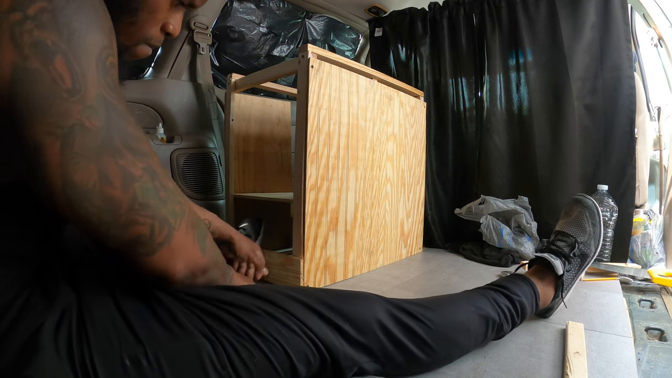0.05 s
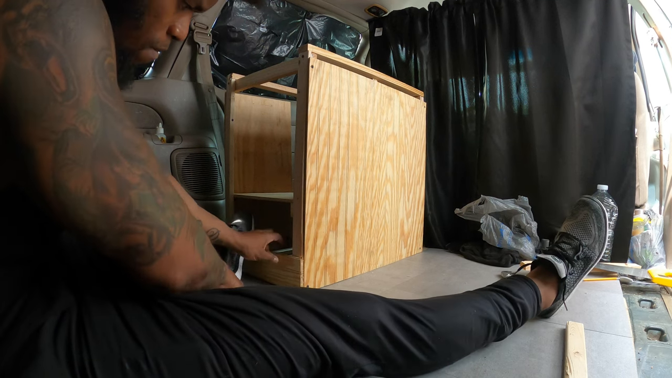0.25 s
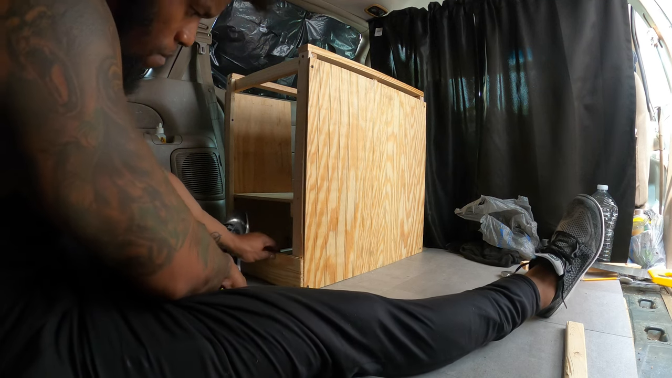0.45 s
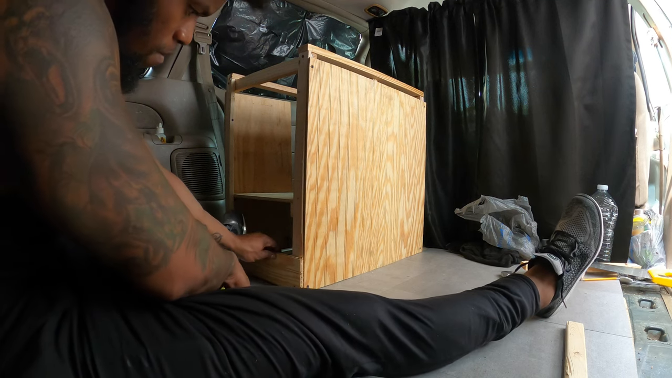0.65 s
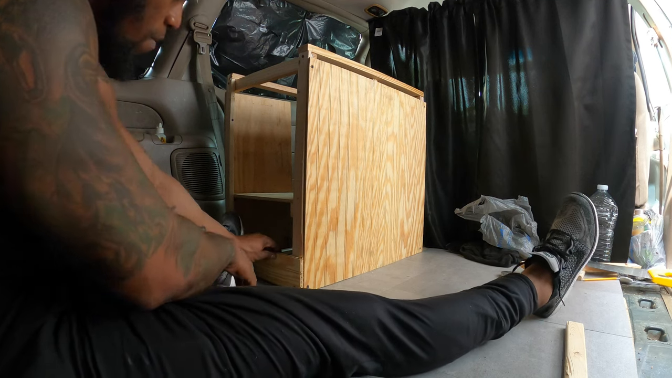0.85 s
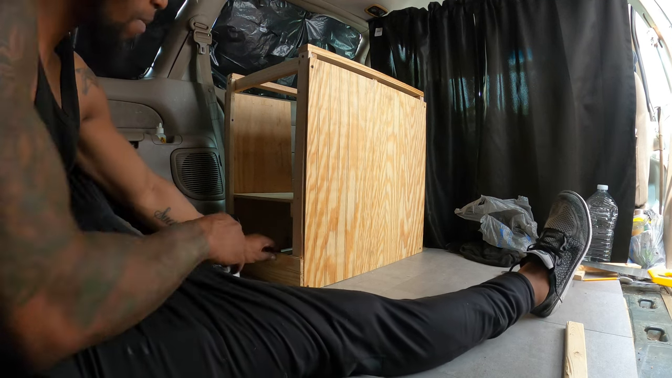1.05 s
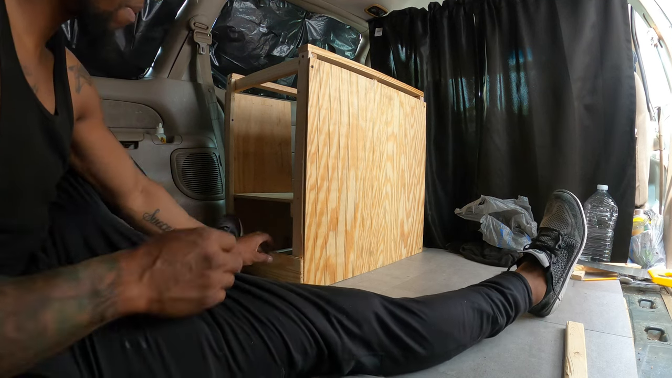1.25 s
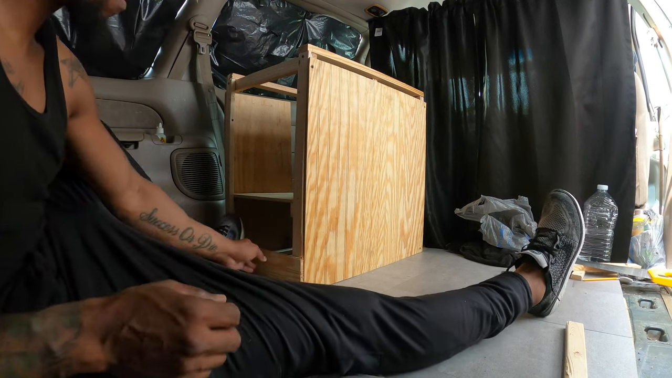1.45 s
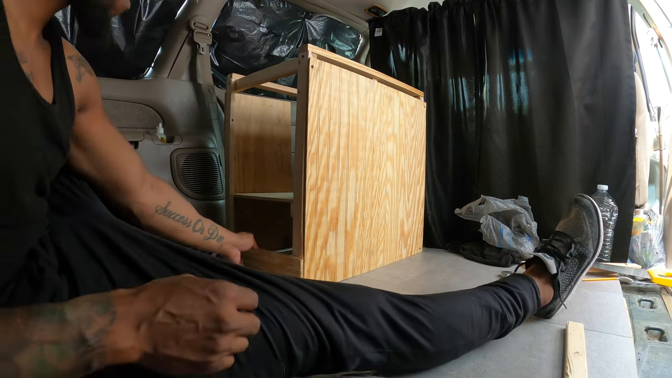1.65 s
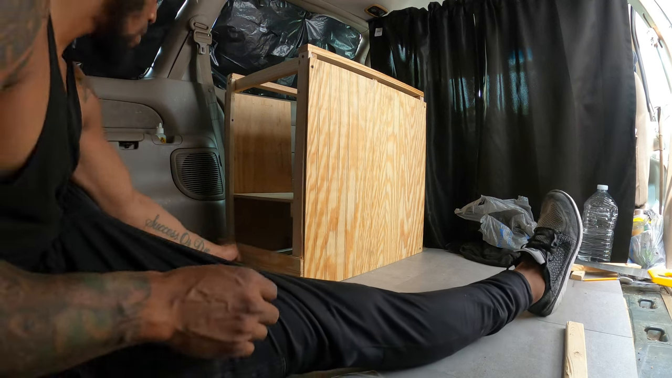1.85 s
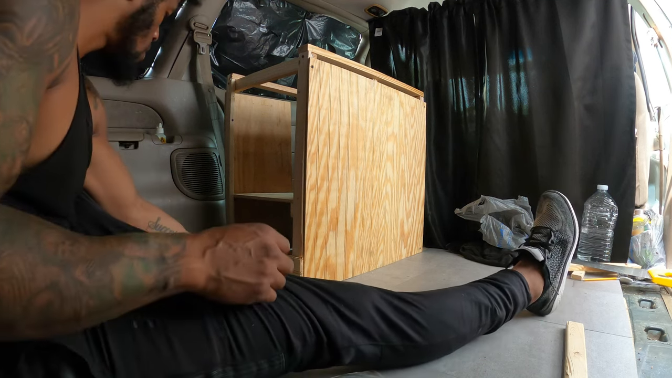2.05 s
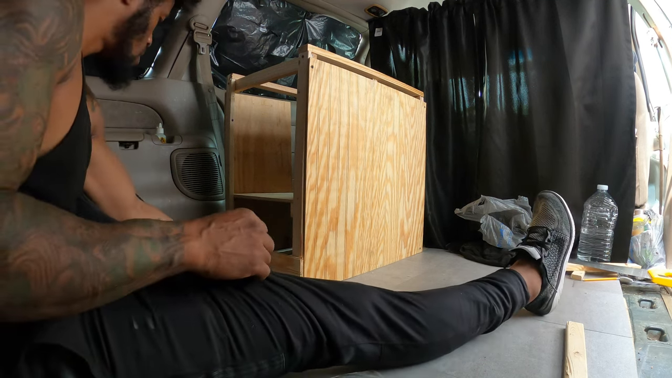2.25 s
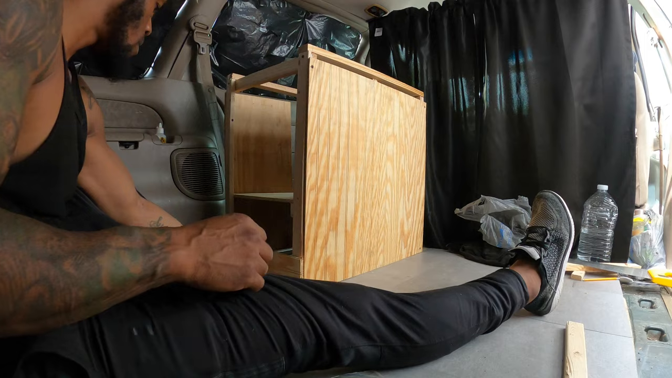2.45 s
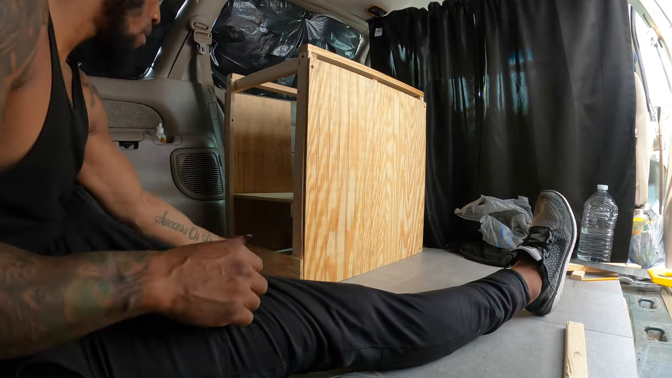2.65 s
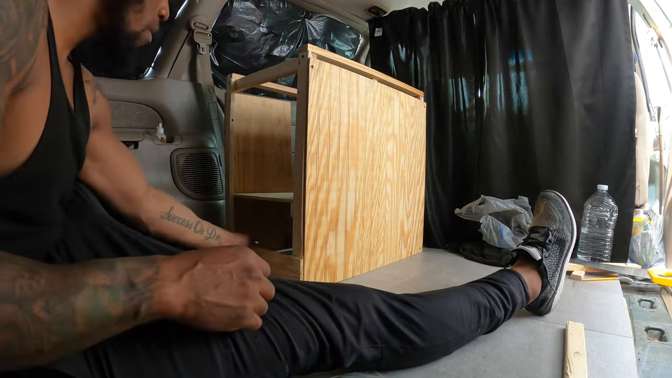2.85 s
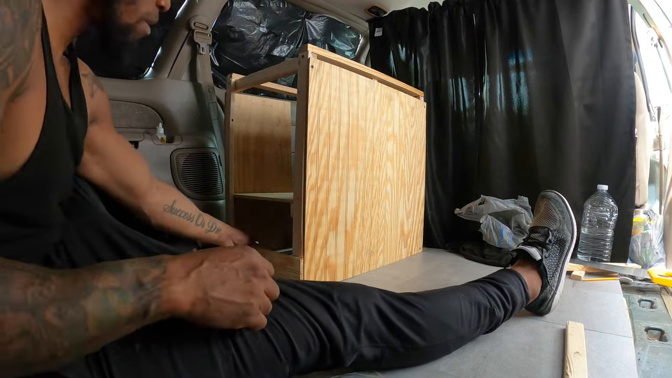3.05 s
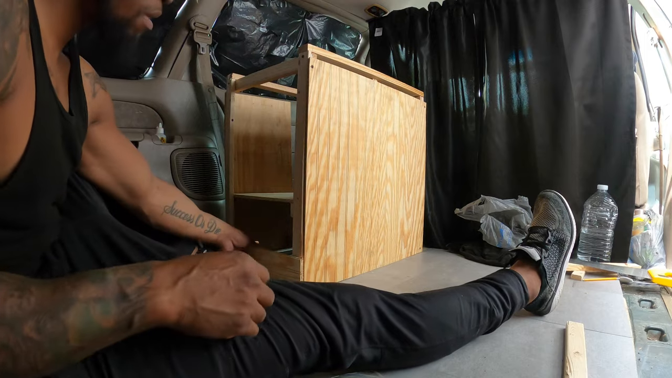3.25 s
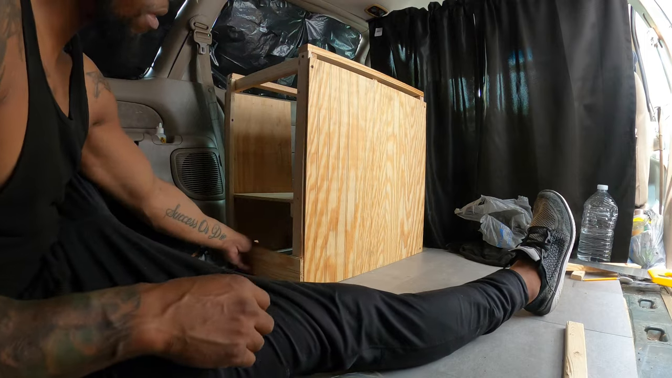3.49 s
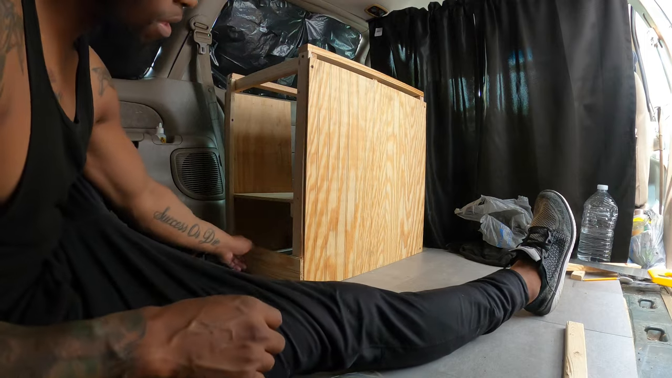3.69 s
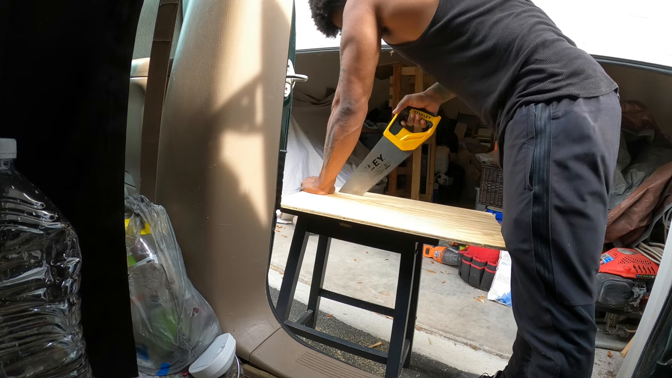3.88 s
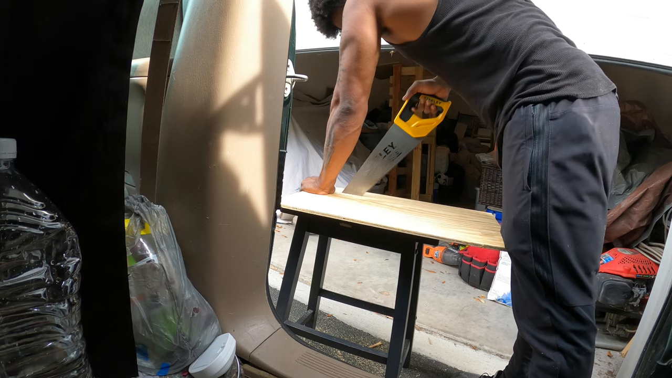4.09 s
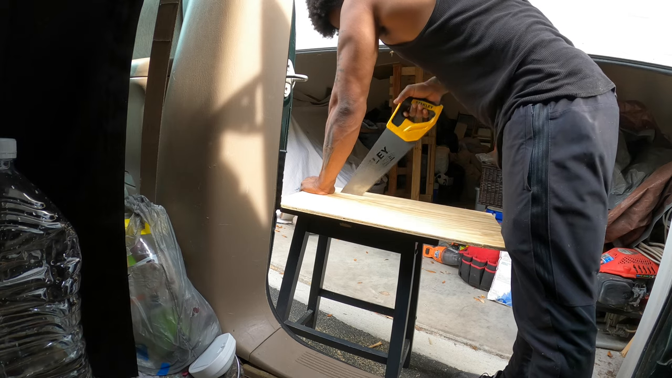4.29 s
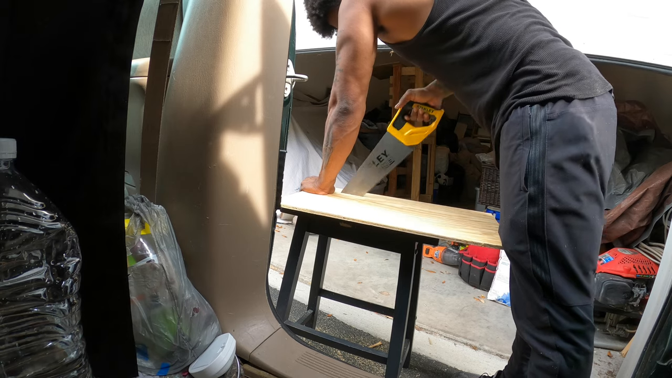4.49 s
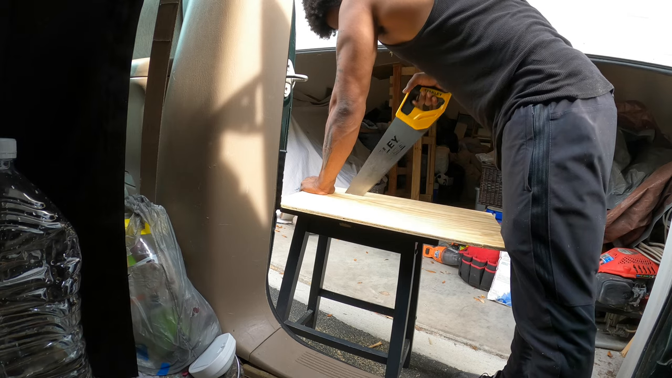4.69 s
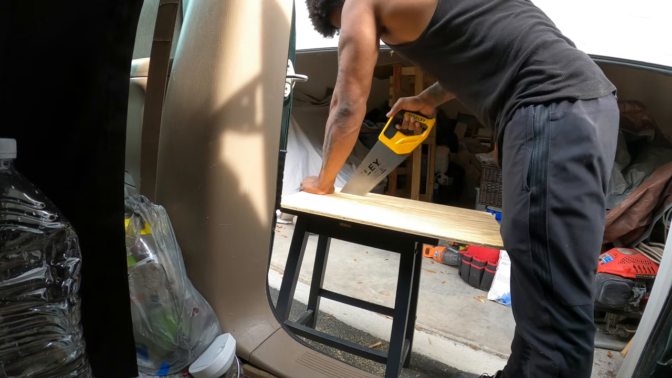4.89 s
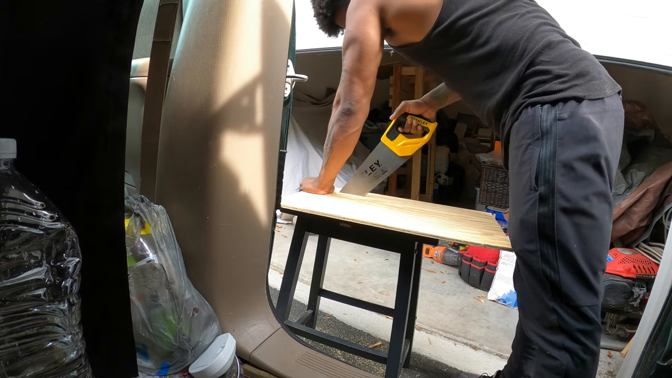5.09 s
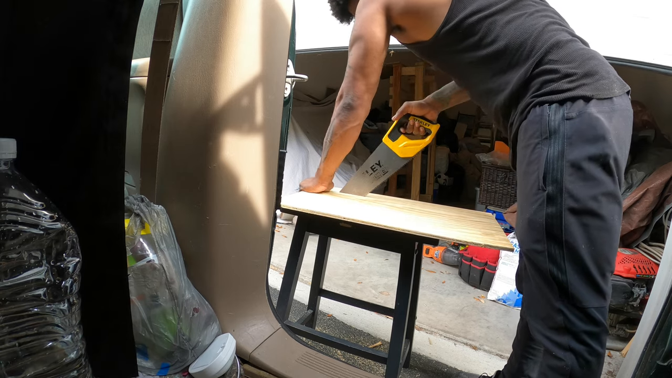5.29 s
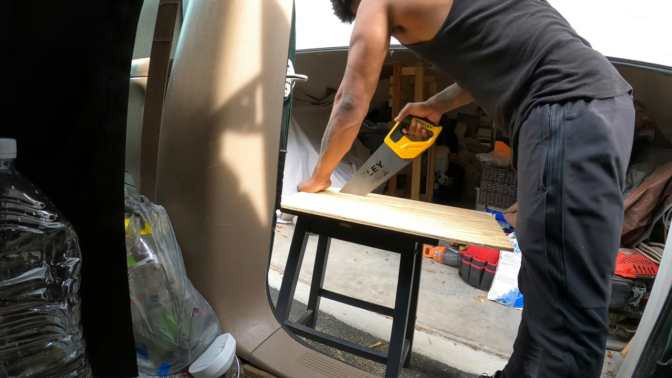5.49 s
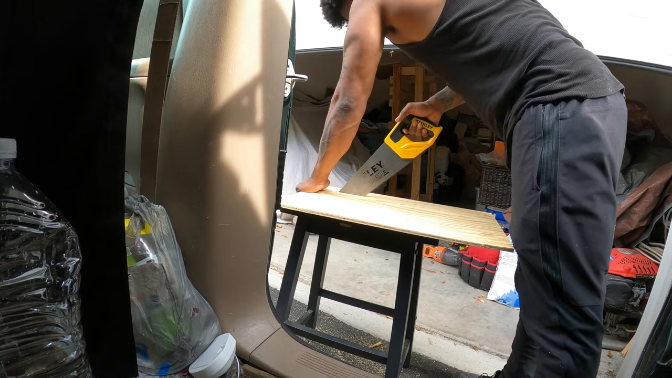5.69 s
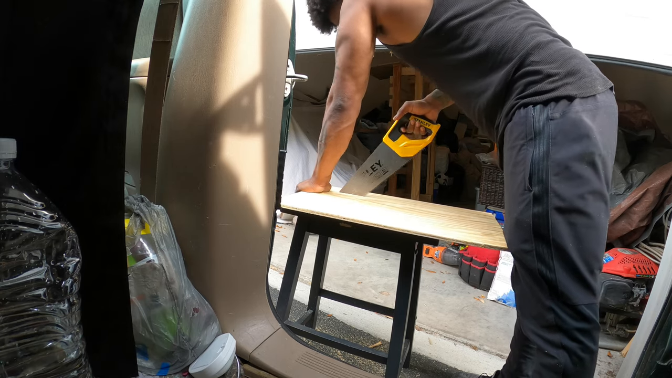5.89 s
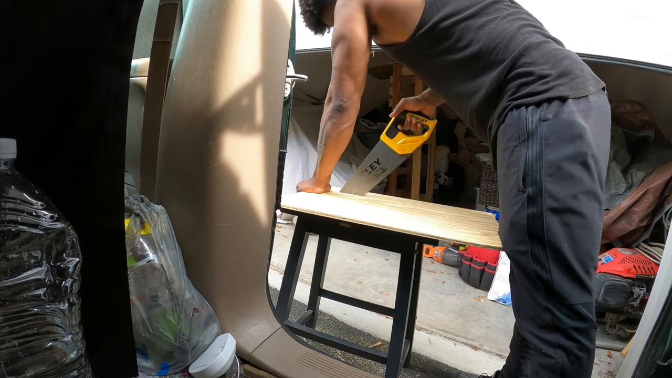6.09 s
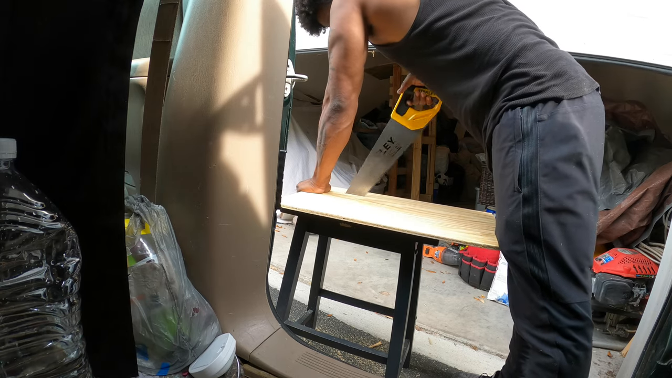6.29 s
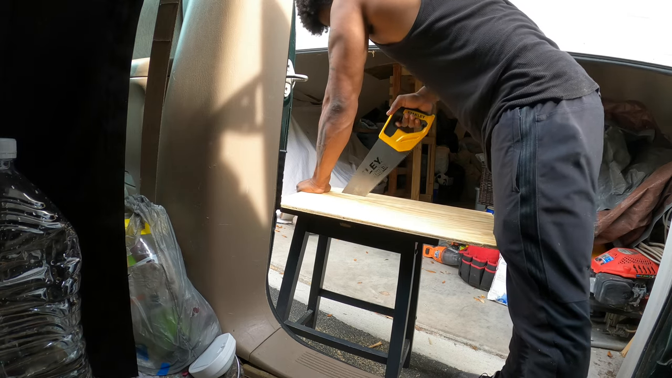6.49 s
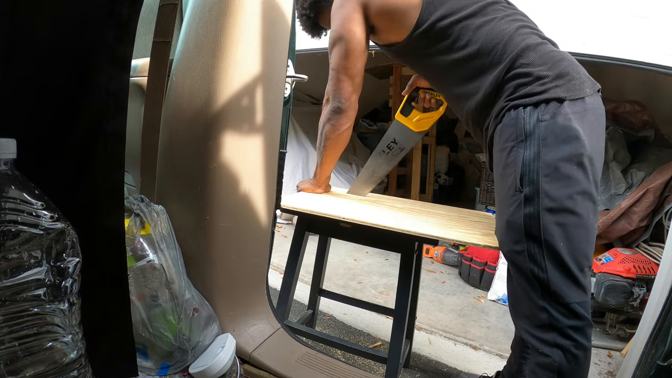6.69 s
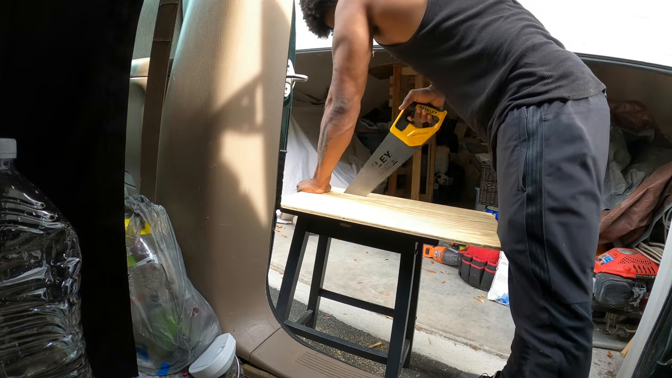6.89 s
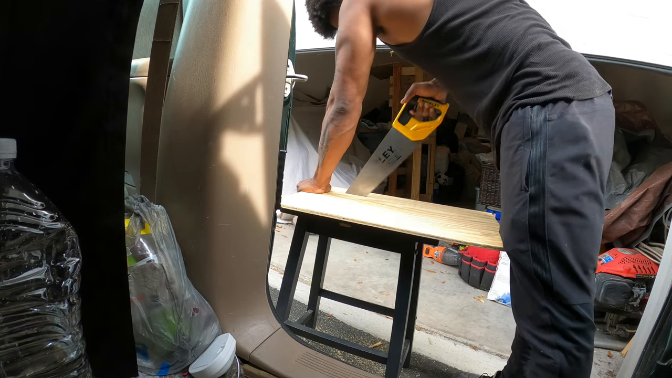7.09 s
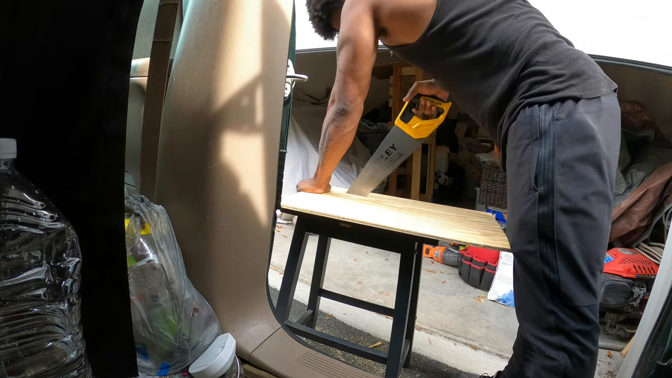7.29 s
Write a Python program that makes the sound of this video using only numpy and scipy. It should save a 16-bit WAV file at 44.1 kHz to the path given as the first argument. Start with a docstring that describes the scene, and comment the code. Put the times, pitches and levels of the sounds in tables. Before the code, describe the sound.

Close stereo pickup in a small van: grainy rubs, cloth stirring, a heavy cabinet knock, scattered tool clicks and a faint far whine swelling twice. A hard cut mid-scrape brings outdoor air and sawing to one side. Each push honks up and down in pitch beneath a coarse rasp; weak pulls scrape between. The strokes stop for about a second, then resume.

```python
"""Rustles, knocks and small clicks over a low rumble, as hands shift a tool against a cabinet in a parked van.
Then the scene changes to just outside the open door, in the middle of a scrape: four quick strokes, a pause,
three more. On each push the teeth speed up and slow down, so the board honks in an arch of pitch under the
rasp. The lighter pulls mostly scrape. Rubs and rasp are noisy grains, knocks are ringing modes, clicks are
short noise bursts and the air is drifting coloured noise; a faint far whine swells twice before the sawing."""
import sys
import numpy as np
from scipy import signal
from scipy.fft import rfft, irfft
from scipy.io import wavfile
from scipy.ndimage import uniform_filter1d

SR = 44100
rng = np.random.default_rng(int(sys.argv[2]) if len(sys.argv) > 2 else 0)


def materialize(psi):
    """Save the field psi as 16-bit PCM at rate SR to the path in sys.argv[1].

    A 1-D psi becomes a single channel; in a 2-D psi each row is a channel.
    """
    bounded = np.clip(np.atleast_2d(psi).T, -1, 1)
    quanta = np.round(bounded * 32767).astype(np.int16)
    wavfile.write(sys.argv[1], SR, quanta)


N = 323694
T = np.arange(N) / SR  # the time of every sample, in seconds
OUTSIDE_S = 3.787  # from here the air is that of the open door

# Pushes of the saw, before the small level trims in saw(): start t/s, speeding up t/s, slowing down t/s,
# rasp level/dB, board hum over the rasp level/dB, treble over the rasp level/dB, top tooth rate f/Hz
PUSHES = [(3.858, 0.055, .075, -19, 0.5, -17, 332.2), (4.185, 0.076, .058, -20.5, -1.5, -17, 349.1),
          (4.545, 0.075, .078, -19.5, 0, -16, 385), (4.896, 0.074, .07, -19.5, 0, -13.5, 400),
          (6.492, .074, .074, -20.5, 2.5, -15, 308.2), (6.832, .056, .064, -22, 2, -15.5, 242.5),
          (7.18, .06, .095, -21.5, 2, -12.5, 375.4)]


def gain_of(db):
    """Turns decibels into an amplitude factor."""
    return 10 ** (np.asarray(db) / 20)


def evened(x):
    """Scales a sound to an average (rms) level of 1."""
    return x / np.sqrt(np.mean(x ** 2) + 1e-20)


def steadied(x, span_s):
    """Holds the rms level near 1 over every short span."""
    power = abs(uniform_filter1d(x ** 2, max(int(span_s * SR), 2)))
    return x / np.sqrt(power + 1e-12)


def read(points, hz):
    """Reads a table of values against frequency, on a log-frequency axis."""
    f, value = np.transpose(points)
    return np.interp(np.log(hz + 1), np.log(f + 1), value)


def add(mix, s, sound):
    """Mixes a sound in at time s (seconds)."""
    part = mix[..., max(round(s * SR), 0):][..., :sound.shape[-1]]
    part += sound[..., :part.shape[-1]]


def wander(hz):
    """Smooth random drift of rms 1, with little movement faster than hz."""
    f = np.fft.rfftfreq(N, 1 / SR)
    return evened(irfft(rfft(rng.standard_normal(N)) / (1 + (f / hz) ** 4), N))


def colour(x, points, rings=(), size=8192):
    """Filters by a smooth spectrum with resonant peaks on top, answering only after each input."""
    hz = abs(np.fft.fftfreq(size, 1 / SR))
    peaks = sum(lift / (1 + (2 * (hz - f) / width) ** 2) for f, width, lift in rings)
    log_gain = np.log(gain_of(read(points, hz) + peaks) + 1e-6)
    # the Hilbert transform supplies the phase that keeps the response from starting early
    response = np.fft.ifft(np.exp(np.conj(signal.hilbert(log_gain)))).real[:size // 2]
    return evened(signal.oaconvolve(x, response[None], axes=1)[:, :N])


def band(x, lo_hz, hi_hz):
    """Keeps a band of frequencies, with gentle slopes."""
    sos = signal.butter(2, [lo_hz, min(hi_hz, SR / 2 - 1000)], "band", fs=SR, output="sos")
    return signal.sosfilt(sos, x)


def brighten(x, treble_db, split_hz):
    """Replaces the treble level by a given one, fixed or moving."""
    top = signal.sosfiltfilt(signal.butter(2, split_hz, "high", fs=SR, output="sos"), x)
    return x - top + evened(top) * gain_of(treble_db)


def grit(per_s, spread_db):
    """Friction as tiny random fractures of uneven size, at the same moments on both sides."""
    size = gain_of(spread_db * np.minimum(rng.exponential(1, N), 4))
    happens = rng.random(N) < per_s / SR
    return evened(size * happens * rng.standard_normal((2, N)))


def arch(start, rise_s, fall_s):
    """A smooth movement from rest up to 1 and back to rest."""
    times = np.cumsum([start, abs(rise_s), abs(fall_s)])
    return np.maximum(np.sin(np.pi * np.interp(T, times, [0, .5, 1])), 0)


def ports(pair, aside):
    """Makes left and right of two signals; waves from a source off to one side reach the right port first."""
    # likeness of the two microphone ports: f/Hz, likeness (1 = the same)
    likeness = [(100, .993), (300, .995), (700, .965), (1400, .92), (2800, .81), (5500, .67), (8400, .86),
                (13000, .62)]
    # left ahead of right for aside = 1: f/Hz, phase/radians
    lead = [(200, 0), (500, -.16), (1000, -.34), (2070, -.7), (3960, -.95), (7750, -2), (9560, -.9),
            (15000, -.3)]
    # left over right for aside = 1: f/Hz, level/dB
    tilt = [(100, 0), (300, -.2), (700, -1), (2800, .3), (5500, -.8), (8400, -4), (13000, -4)]
    hz = np.fft.rfftfreq(N, 1 / SR)
    a, b = rfft(pair)
    same = np.clip(read(likeness, hz), 0, 1)
    # half of each difference goes to either side
    shift = gain_of(aside * read(tilt, hz) / 2) * np.exp(.5j * aside * read(lead, hz))
    left = a * shift
    right = (same * a + np.sqrt(1 - same ** 2) * b) / shift
    return irfft(np.array([left, right]), N)


def air():
    """Drifting coloured noise: lumpy rumble in the van, with a whine that swells twice, then traffic at its door."""
    # spectrum within the van: f/Hz, relative level/dB
    cabin_colour = [(12, -34.5), (20, 3), (64, -6), (94, -11), (121, -19.5), (249, -24.5), (286, -31),
                    (841, -48.5), (1020, -35.5), (1240, -37.5), (1510, -45.5), (1640, -44), (2040, -46.5),
                    (7300, -66), (15000, -99)]
    # spectrum at the door: f/Hz, relative level/dB
    yard_colour = [(12, -31.5), (20, -3), (54, -5), (115, -5.5), (217, -21.5), (256, -29), (294, -22.5),
                   (328, -31), (457, -36), (497, -37.5), (693, -33), (1420, -34.5), (2040, -43),
                   (2620, -45), (15000, -74)]
    # changes of the low rumble in the van: t/s, level/dB
    rumble = [(0, 0), (.7, 2), (1.1, -3), (1.6, -1.5), (2.1, 0), (2.9, 1), (3.4, 0), (3.78, -2.5)]
    # swells of the whine: start t/s, rise t/s, fall t/s, level/dB
    whines = [(1.03, 0.22, 0.46, -60), (3.26, .12, 0.37, -61.5)]
    rumble_below_hz, whine_hz = 89, 1284

    cabin = colour(rng.standard_normal((2, N)), cabin_colour) * gain_of(-34 + wander(2.1))
    low = signal.sosfiltfilt(signal.butter(2, rumble_below_hz, fs=SR, output="sos"), cabin)
    cabin = cabin - low + low * gain_of(np.interp(T, *np.transpose(rumble)))
    yard = colour(rng.standard_normal((2, N)), yard_colour) * gain_of(-36.5 + 0.42 * wander(2))
    swell = sum(gain_of(db) * arch(*timing) for *timing, db in whines)
    turns = np.cumsum(whine_hz + 9 * wander(41)) / SR  # the pitch wavers by about 9 Hz
    whine = np.sqrt(2) * swell * np.sin(2 * np.pi * turns)
    return ports(np.where(T < OUTSIDE_S, cabin + whine, yard), aside=0.14)


def handling():
    """Rubs swell and fade as grainy friction; a sleeve brushes past at first, and cloth stirs faintly in the van."""
    # hands and tool on wood and cloth: start t/s, length t/s, level/dB, treble over that level/dB
    rub_list = [(0.0, 0.026, -44.5, -20), (0.061, 0.19, -44, -21), (0.247, 0.12, -56, -19),
                (0.434, 0.071, -45.5, -13), (0.595, 0.036, -54.5, -36), (0.643, 0.042, -46.5, -19),
                (0.748, 0.048, -48, -28), (0.795, 0.082, -50.5, -30), (0.953, 0.23, -51, -21),
                (1.656, 0.13, -48.5, -11), (1.843, 0.34, -56, -23), (2.106, 0.11, -44.5, -16.5),
                (2.257, 0.14, -49.5, -37), (2.527, 0.14, -45, -30), (2.858, 0.073, -59, -35),
                (3.153, 0.19, -51.5, -20), (5.53, 0.062, -55, -14), (5.636, 0.096, -57.5, -5),
                (5.884, 0.047, -53, -12)]
    # spectrum of the rubs: f/Hz, relative level/dB
    rub_colour = [(210, 1.5), (520, -6), (1150, -1), (2250, -5), (3550, -8), (5100, -9), (8100, -12),
                  (10100, -31), (15100, -39)]
    # a sleeve brushing close by: t/s, level/dB
    sleeve_levels = [(0, -28), (0.1, -26), (0.2, -28.5), (0.3, -30.5), (0.38, -44.5), (0.43, -58)]
    # spectrum of the sleeve: f/Hz, relative level/dB
    sleeve_colour = [(40, -16), (100, 7.5), (250, -5), (520, -11.5), (700, -23), (1400, -28.5), (2200, -41),
                     (5000, -47), (12000, -66)]

    rub_rings = [(1810, 110, 5.9), (3250, 260, 3.1), (4680, 290, 5.1)]  # f/Hz, width/Hz, lift/dB
    grain = colour(grit(per_s=5000, spread_db=2.0), rub_colour, rub_rings)
    rubs = brighten(grain, -11.5, 4540) * gain_of(-62.5) * (T < OUTSIDE_S)  # the faint cloth
    for s, length, db, treble_db in rub_list:
        part = grain[:, max(round(s * SR), 0):][:, :max(round(length * SR), 200)]
        swell = signal.windows.tukey(part.shape[1], .7)
        add(rubs, s, gain_of(db) * brighten(part, treble_db, 4400) * swell)

    sleeve = colour(grit(per_s=2000, spread_db=-0.5), sleeve_colour, [(1220, 420, 2.4)])
    sleeve = sleeve * gain_of(np.interp(T, *np.transpose(sleeve_levels)) + 0.91 * wander(30))
    return ports(rubs + sleeve * (T < sleeve_levels[-1][0]), aside=0.8)


def knocks():
    """A padded blow gives a short woody clack and rings the cabinet; stiff spots ring higher and shorter."""
    # knocks on the cabinet: t/s, level/dB, clack over that level/dB, pitch factor
    knock_list = [(0.451, -16, -21.5, 0.98), (0.475, -21, -16, 1.14), (0.504, -24, -40, 0.76),
                  (1.283, -44.5, -4, 1.6), (1.723, -35, -4.5, 1.34), (1.912, -27, -7.5, 0.83),
                  (2.135, -36, -19, 1.3), (2.196, -28, -15, 1.25), (3.063, -43.5, -3.5, 1.26),
                  (3.17, -42.5, 2, 1.4)]
    # cabinet modes at pitch factor 1, before a small random detuning:
    # f/Hz, relative level/dB, time to fall 60 dB t/s
    cabinet = [(65.2, 4.5, 0.31), (110.2, 3.5, 0.23), (137.5, -1, 0.18), (171.2, 1, 0.36), (215, -8, 0.35),
               (276.4, -1, 0.16), (392, -6.5, 0.11), (464.4, -13, 0.16)]
    out, t = np.zeros((2, N)), np.arange(SR // 3) / SR
    onset = 1 - np.exp(-t / 0.0012)
    for s, db, clack_db, pitch in knock_list:
        thud = np.zeros(len(t))
        for hz, level, t60 in cabinet:
            mode_hz = hz * pitch * rng.uniform(0.88, 1.03)
            thud += gain_of(level - 60 * t * pitch / t60) * np.sin(2 * np.pi * mode_hz * t)
        clack = evened(band(rng.standard_normal((2, len(t))), 830, 1360))
        clack = clack * gain_of(clack_db - 60 * t / 0.077)
        add(out, s, gain_of(db) * (gain_of(-6) * thud + clack) * onset)
    return ports(out, aside=.1)


def clicks():
    """A sharp snap of noise and its quick scatter off nearby surfaces."""
    # clicks of tool and blade: t/s, level before a 7 dB cut level/dB, centre f/Hz, half width/octaves,
    # time for the scatter to fall 60 dB t/s
    click_list = [(0.48, -34.5, 3400, 0.67, 0.066), (0.758, -44, 2000, .8, 0.054),
                  (1.031, -23.5, 1490, 0.077, 0.025), (1.651, -43, 5560, 0.56, 0.061),
                  (1.721, -30.5, 4130, 0.76, .07), (1.734, -35, 3930, 0.49, 0.039),
                  (1.921, -38.5, 2800, 0.57, .05), (2.134, -34, 1490, 0.62, 0.099),
                  (2.199, -24.5, 400, 0.33, 0.12), (2.285, -34.5, 3420, 0.85, 0.03),
                  (2.29, -33.5, 2570, 0.82, 0.044), (4.347, -26, 5100, 0.54, 0.013),
                  (5.435, -50, 5250, 0.4, 0.15)]
    out, t = np.zeros((2, N)), np.arange(SR // 5) / SR
    for s, db, hz, octaves, t60 in click_list:
        snap = evened(band(rng.standard_normal((2, len(t))), hz / 2 ** octaves, hz * 2 ** octaves))
        fade = np.exp(-t / 0.0024) + gain_of(-1.5 - 60 * t / t60)  # snap, then scatter
        add(out, s, snap * gain_of(db - 7) * fade)
    return ports(out, aside=0.21)


def tooth_rate():
    """Teeth passing the cut each second: an arch on each push, a fixed slow rate otherwise."""
    slow_hz, curve = 177.94, 2.3  # rate at the ends of a push; a higher curve makes a narrower arch
    rate = np.full(N, slow_hz)
    for *timing, _, _, _, top_hz in PUSHES:
        rate += (top_hz - slow_hz) * arch(*timing) ** curve
    return rate


def stroke_power(strokes, grip):
    """Power of rasp, hum and treble: the blade's speed raised to grip, with a brief lingering ring."""
    linger_db, linger_t60_s = -7.5, 0.36
    power = 0
    for start, rise_s, fall_s, db, hum_db, treble_db, *_ in strokes:
        peak = gain_of([[db], [db + hum_db], [db + treble_db]]) ** 2
        power = power + peak * arch(start, rise_s, fall_s) ** grip
    keep = gain_of(-60 / (linger_t60_s * SR)) ** 2  # share of the power left after one sample
    return power + gain_of(linger_db) ** 2 * signal.lfilter([1 - keep], [1, -keep], power + 1e-14)


def saw_levels(rate):
    """Adds the power of pushes and pulls: rasp in dB, then hum and treble in dB over the rasp."""
    # pulls of the saw, before the small level trims in saw(): start t/s, speeding up t/s, slowing down t/s,
    # rasp level/dB, board hum over the rasp level/dB, treble over the rasp level/dB
    pulls = [(3.786, 0.0046, 0.061, -35, 0.5, -19), (3.975, 0.1, 0.1, -33, -3.5, -18.5),
             (4.31, .16, 0.078, -37.5, -1.5, -17), (4.665, .11, .11, -32, 2.5, -18),
             (5.01, 0.042, 0.098, -35.5, -1, -22), (6.24, 0.18, 0.063, -34, -5, -13),
             (6.63, 0.089, 0.092, -33, -0.5, -15), (6.945, 0.17, .1, -38.5, 2, -16.5)]
    # the board honks when the teeth meet its modes: tooth rate f/Hz, added hum level/dB
    honk = [(180, 5.5), (222, 3), (262, 2), (300, 4), (345, -3.5), (400, -1.5)]
    push, pull = stroke_power(PUSHES, grip=2.05), stroke_power(pulls, grip=1.54)
    push[1] *= gain_of(read(honk, rate)) ** 2
    rasp_db, hum_db, treble_db = 10 * np.log10(push + pull)
    return rasp_db, hum_db - rasp_db, treble_db - rasp_db


def teeth(rate, jitter, uneven_db):
    """Each tooth strikes the wood and tears briefly: returns the blows and the tearing that follows them."""
    turns = np.cumsum(rate * (1 + jitter * wander(150))) / SR  # teeth passed so far
    blows = np.diff(np.floor(turns), prepend=0) * gain_of(uneven_db * rng.standard_normal(N))
    tearing = .55 + np.exp(-(turns % 1) / .4)
    return evened(blows), evened(tearing)


def board(drive):
    """The board's low modes answer the blows of the teeth, held to an even loudness."""
    # low modes of the board on its stool: f/Hz, width/Hz, relative level/dB
    modes = [(204, 32, -8.5), (219.4, 21.6, 1), (266.3, 43, -1), (298.4, 13, 5), (339.6, 9.2, -2)]
    t = np.arange(SR // 4) / SR
    ring = np.zeros(len(t))
    for hz, width, db in modes:
        ring += gain_of(db) * width * np.exp(-np.pi * width * t) * np.cos(2 * np.pi * hz * t)
    return steadied(band(signal.oaconvolve(drive, ring)[:N], 134, 400), 0.021)


def blade(x, rate, t60, ring_db):
    """The steel sheet's crowd of short modes ripples the upper rasp; the pattern shifts as teeth pass."""
    t = np.arange(SR // 8) / SR
    rings = band(rng.standard_normal((3, len(t))) * gain_of(-60 * t / t60), 1380, 19000)
    travel = 2 * np.pi * np.cumsum(rate) / SR / 36  # one turn for every 36 teeth
    ring = 0
    for k, mode_noise in enumerate(rings):
        part = x * np.cos(travel + k * np.pi / 3)
        response = mode_noise[None] / np.linalg.norm(mode_noise)
        ring = ring + signal.oaconvolve(part, response, axes=1)[:, :N]
    return evened(x + gain_of(ring_db) * ring)


def saw():
    """Hard pushes bite with regular teeth and tearing fibres; light pulls skate with looser scraping."""
    # spectrum of the biting push: f/Hz, relative level/dB
    bite_colour = [(160, -8.5), (330, -6.5), (470, -2.5), (760, -2.5), (1120, -2), (2050, -8.5),
                   (3100, -8.5), (5100, -10.5), (7100, -15.5), (8900, -24.5), (10100, -27), (13100, -31.5),
                   (15600, -52.5)]
    # spectrum of the sliding pull: f/Hz, relative level/dB
    slide_colour = [(160, -28), (330, 12.5), (470, -1.5), (760, -1.5), (1120, 0), (2050, -5.5),
                    (3600, -6.5), (5100, -10), (7100, -15.5), (8900, -29.5), (10100, -26), (15600, -41)]
    # ringing of wood and blade that stands out of the rasp: f/Hz, width/Hz, lift level/dB
    ring_peaks = [(539, 8.9, 6), (674, 42, 12.5), (770, 72, 8.5), (872, 77, 9.5), (1006, 7.7, 12.5),
                  (1073, 27, 4), (1223, 90, 5.5), (1482, 56, 6.5), (1870, 190, 5.5), (2550, 41, 4.5),
                  (2670, 110, 3.5), (2780, 44, 2), (5170, 350, 3), (8330, 1550, 13.5)]
    bite_from_db, bite_full_db = -33.5, -22  # rasp levels where the teeth begin to bite, and bite fully

    rate = tooth_rate()
    rasp_db, hum_db, treble_db = saw_levels(rate)
    biting = np.clip((rasp_db - bite_from_db) / (bite_full_db - bite_from_db), 0, 1)

    blows, tearing = teeth(rate, jitter=.025, uneven_db=4.0)
    fibres = tearing * grit(per_s=9500, spread_db=3.5)
    push = colour(fibres + gain_of(-10.5) * blows, bite_colour, ring_peaks)

    bumps, skating = teeth(rate, jitter=.22, uneven_db=4)
    dust = skating * grit(per_s=6000, spread_db=1.0) * gain_of(1.83 * wander(50))
    pull = colour(dust + gain_of(-16.0) * bumps, slide_colour, ring_peaks)
    # the blade rubs unevenly on the sides of the cut
    pull = evened(pull + 0.19 * wander(24) * band(pull, 1200, 2940))

    rasp = np.sqrt(biting) * push + np.sqrt(1 - biting) * pull
    rasp = blade(rasp, rate, t60=.045, ring_db=-5)
    rasp = brighten(rasp, treble_db + 2.0, 4470)
    hum = board(biting * (blows + gain_of(-4) * fibres[0]) + (1 - biting) * (bumps + dust[0]))
    sound = gain_of(-0.4) * rasp + gain_of(hum_db + 0.17) * hum
    return ports(gain_of(rasp_db) * sound, aside=1.0)


def clacks_and_thumps():
    """Noise bursts in two bands: the first a jolt where the scene changes mid-scrape, the later ones the blade
    catching."""
    # a jolt as the scene changes (first row), then catches of the blade in the cut: # t/s, clack level/dB,
    # thump level/dB
    bursts = [(3.786, -37, -42), (4.018, -27, -36), (4.332, -22.5, -22), (4.803, -28.5, -21),
              (5.046, -23.5, -36), (5.122, -37, -48), (6.966, -28.5, -34)]
    rise_s, t60_s = 0.0024, 0.13
    out, t = np.zeros((2, N)), np.arange(SR // 4) / SR
    envelope = (1 - np.exp(-t / rise_s)) * gain_of(-60 * t / t60_s)
    for s, clack_db, thump_db in bursts:
        noise = rng.standard_normal((2, len(t)))
        clack = gain_of(clack_db) * evened(band(noise, 560, 900))
        thump = gain_of(thump_db) * evened(band(noise, 190, 340))
        add(out, s, envelope * (clack + thump))
    return ports(out, aside=.8)


def walls(x, t60, wet_db):
    """Short diffuse reflections from the van's panels, made by fading noise, reach the two close ports."""
    t = np.arange(SR // 3) / SR
    fading = rng.standard_normal((2, len(t))) * gain_of(-60 * t / t60) * (t > .003)
    taps = band(fading, 696, 10000)
    echoes = signal.oaconvolve(x[:1], taps / np.linalg.norm(taps[0]), axes=1)[:, :N]
    return gain_of(wet_db) * ports(echoes, aside=1.0)


def scene():
    """All sources with their reflections, over the air."""
    near = handling() + knocks() + clicks() + saw() + clacks_and_thumps()
    return near + walls(near, t60=0.18, wet_db=-8.5) + air()


def record(dry):
    """A slightly keener left microphone, a soft ceiling on the sharpest peaks, then a treble limit."""
    left_db, ceiling, edge_hz = .3, .72, 15750  # ceiling: full scale is 1
    heard = dry * gain_of([[left_db], [0]])
    heard = heard / (1 + (heard / ceiling) ** 6) ** (1 / 6)
    low_pass = signal.firwin(511, edge_hz, window=("kaiser", 9), fs=SR)
    return signal.oaconvolve(heard, low_pass[None], "same")


dry = scene()
out = record(dry)
materialize(out)
```